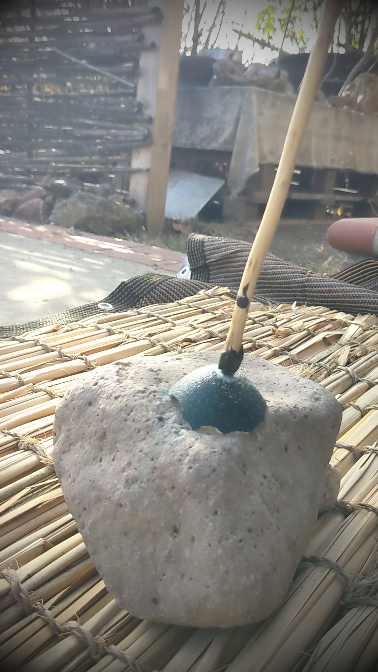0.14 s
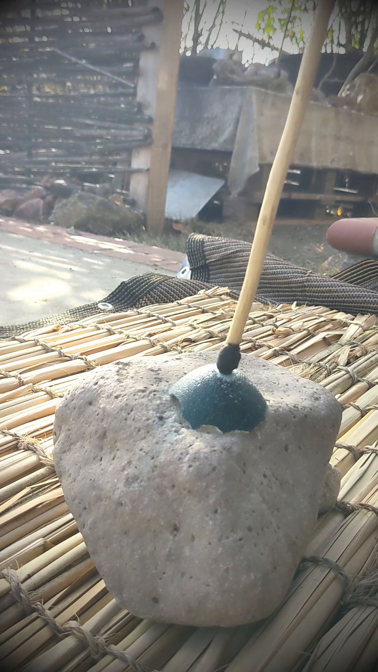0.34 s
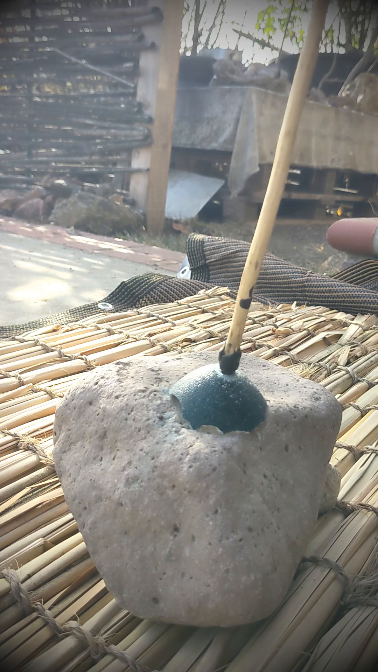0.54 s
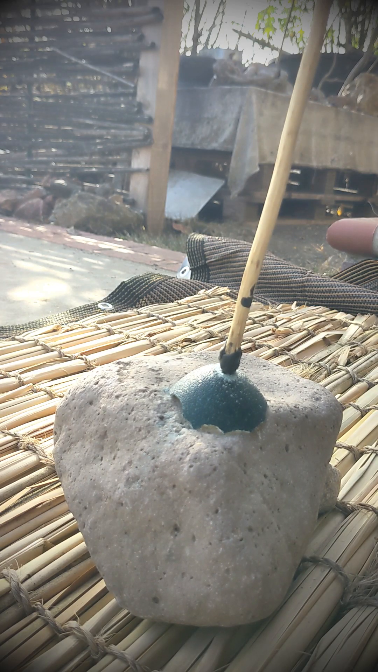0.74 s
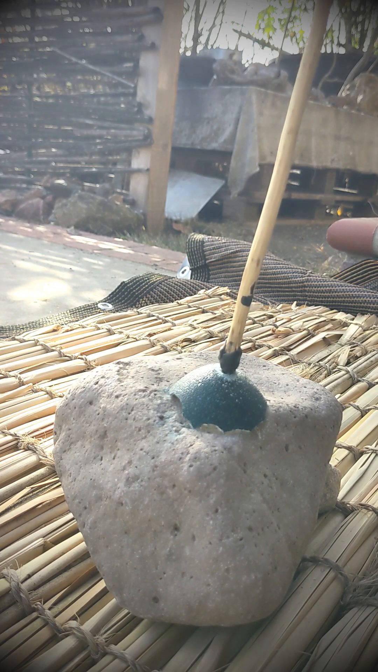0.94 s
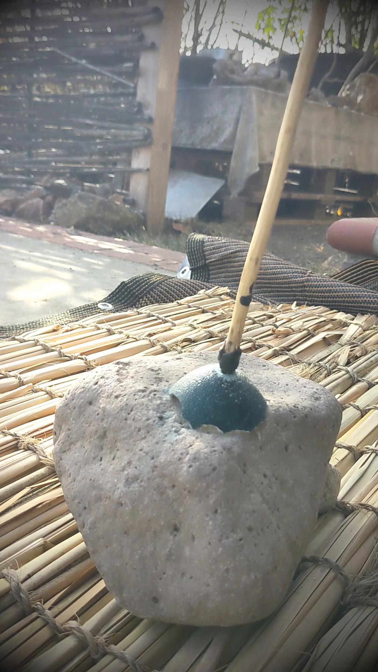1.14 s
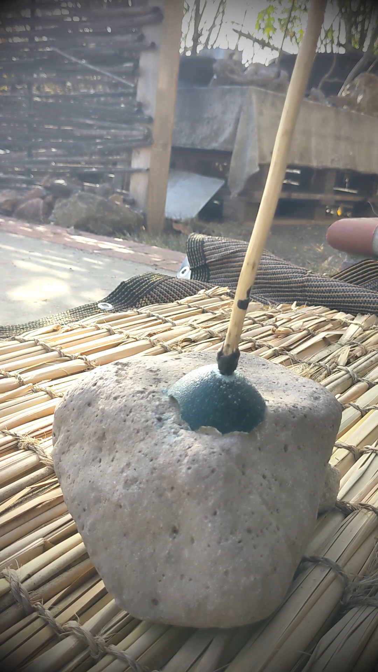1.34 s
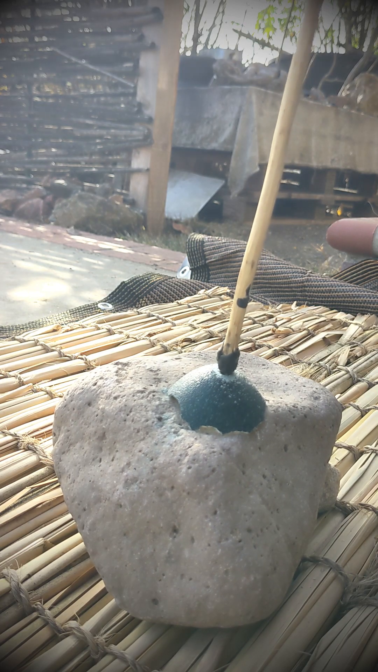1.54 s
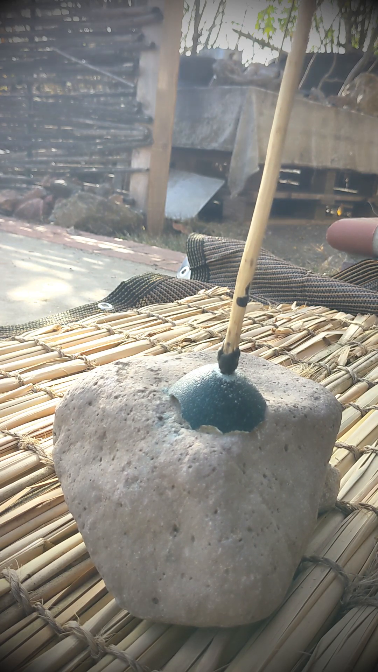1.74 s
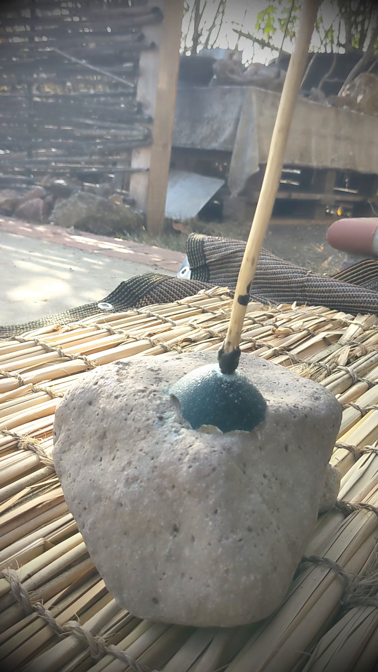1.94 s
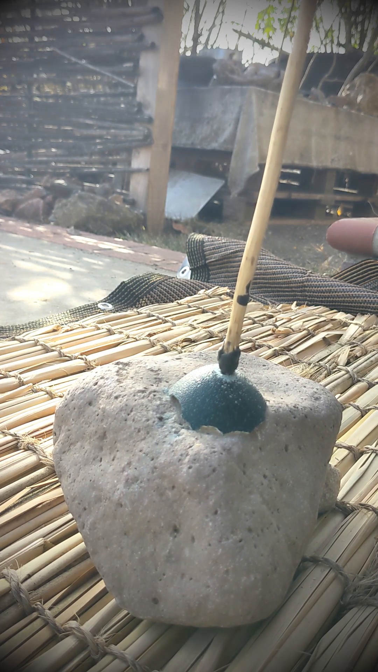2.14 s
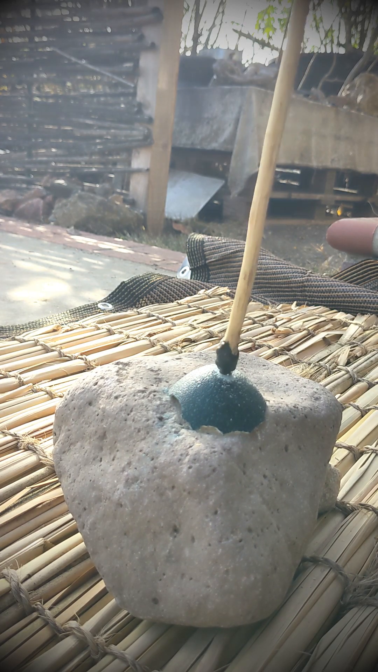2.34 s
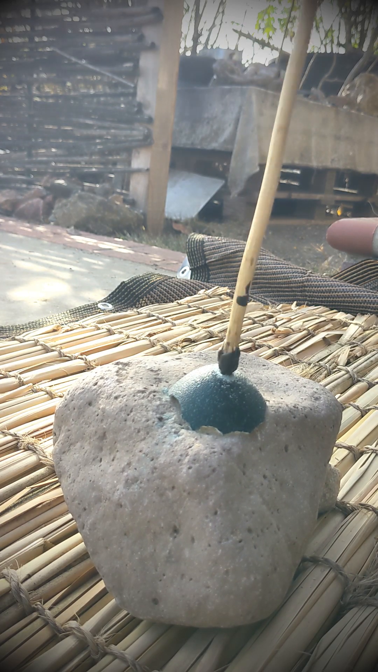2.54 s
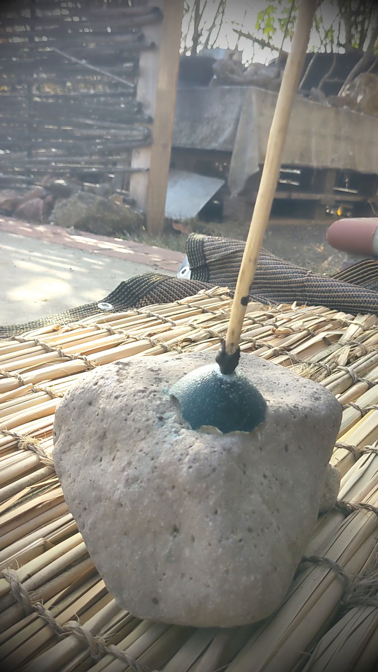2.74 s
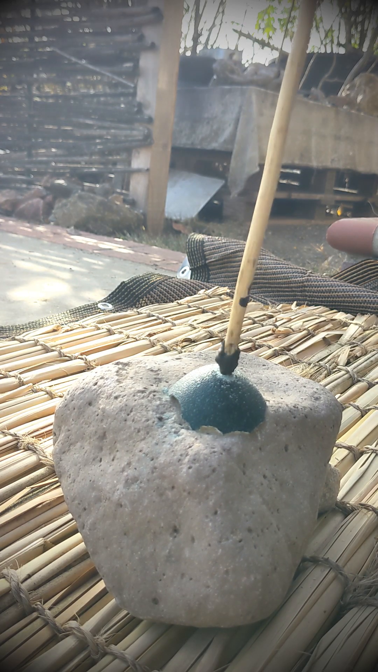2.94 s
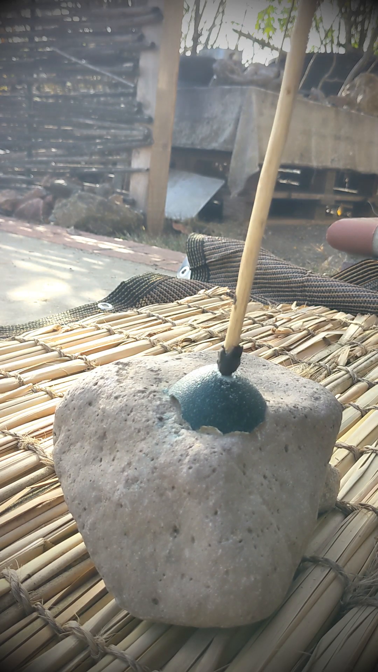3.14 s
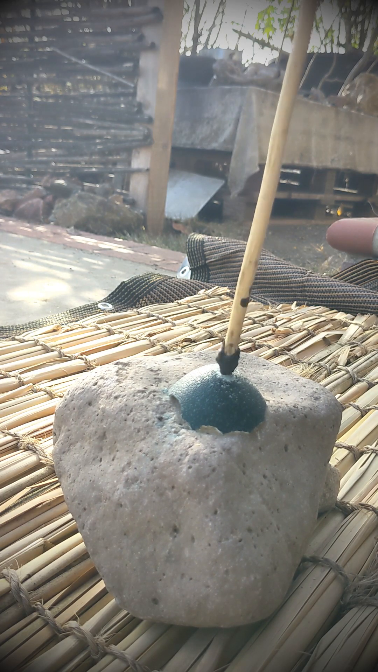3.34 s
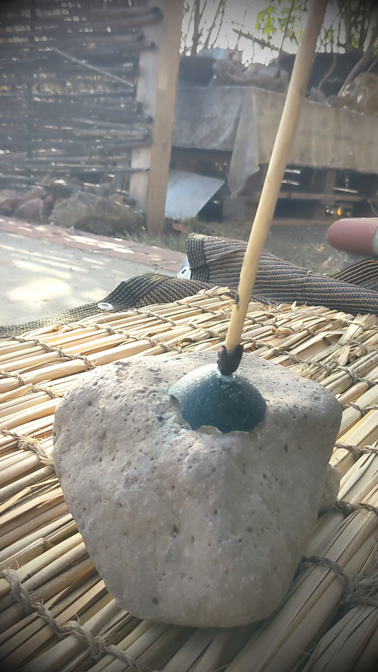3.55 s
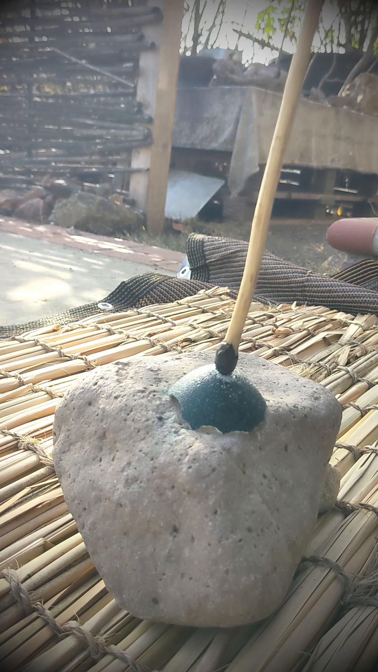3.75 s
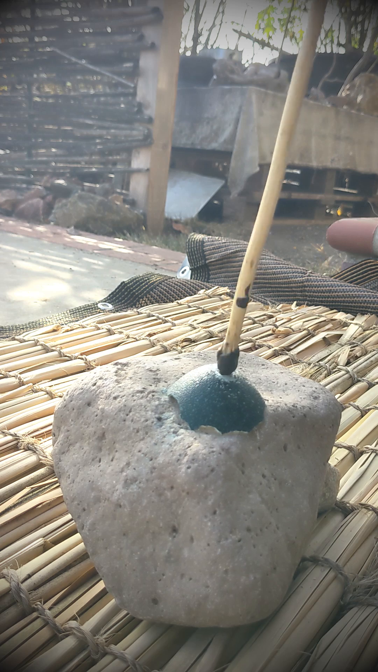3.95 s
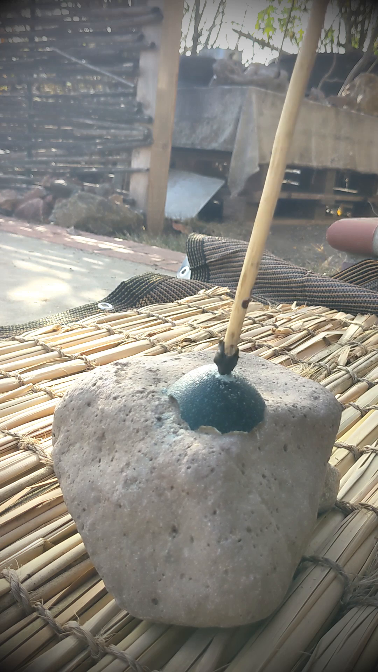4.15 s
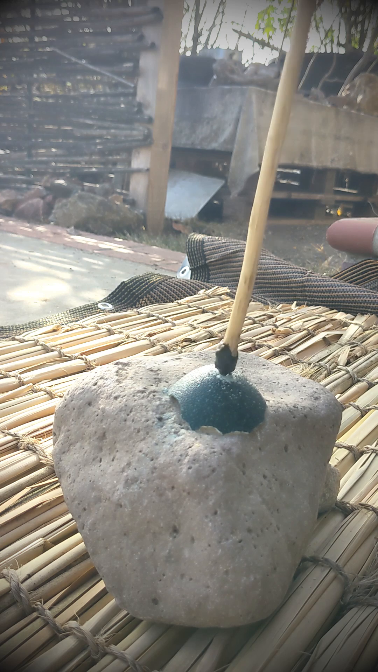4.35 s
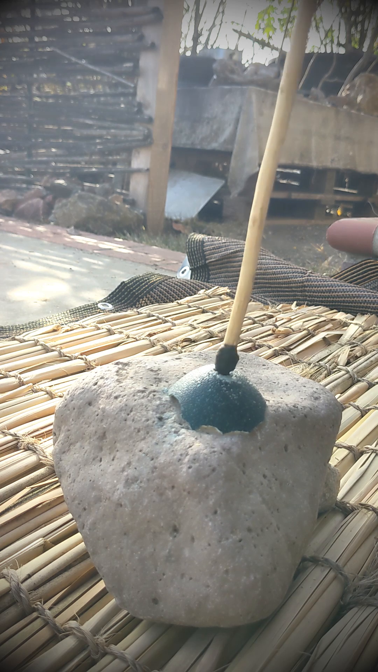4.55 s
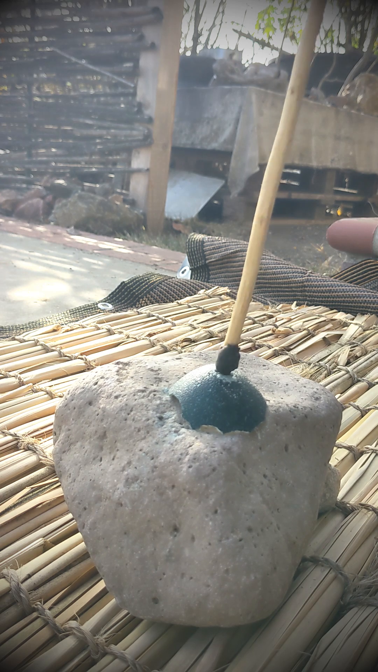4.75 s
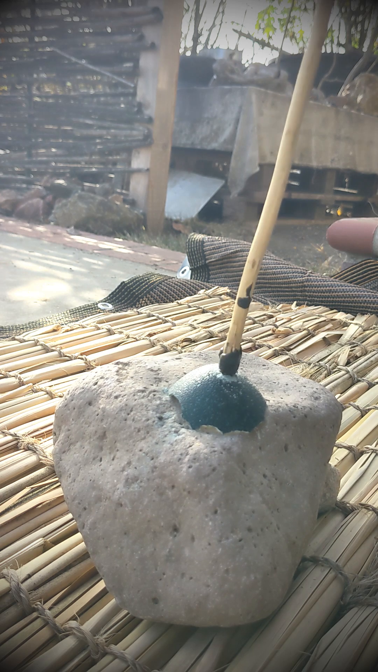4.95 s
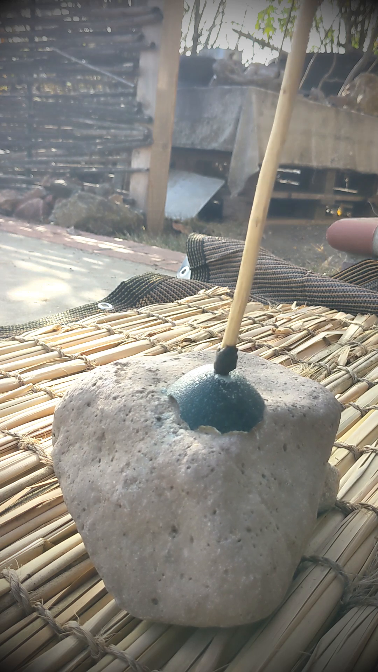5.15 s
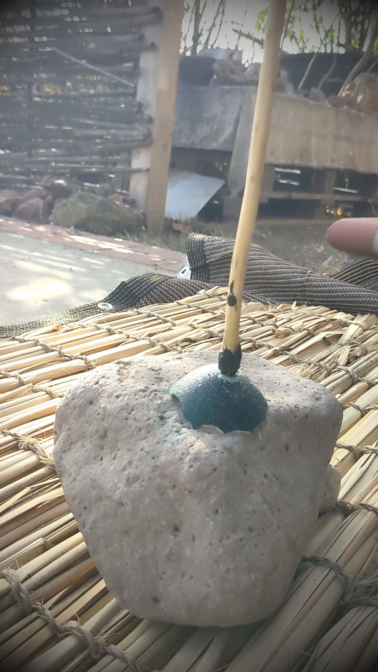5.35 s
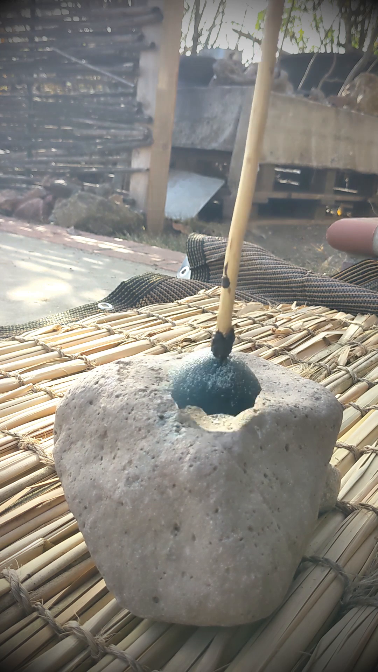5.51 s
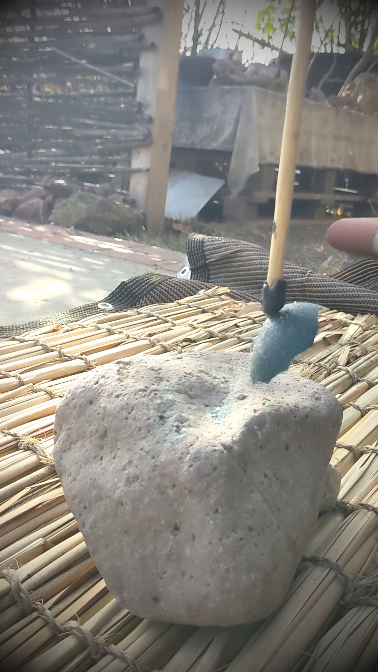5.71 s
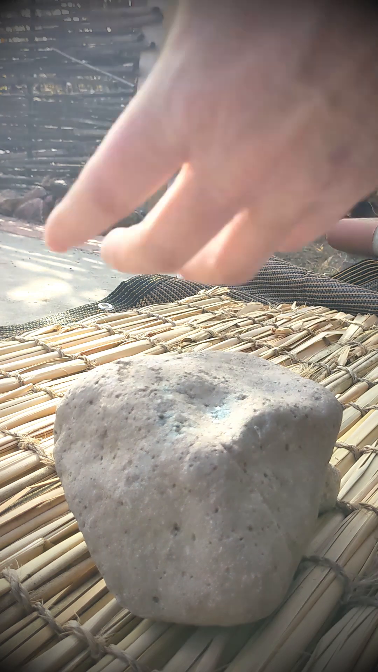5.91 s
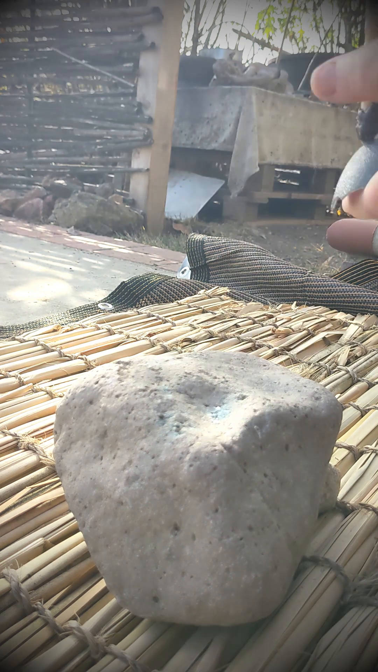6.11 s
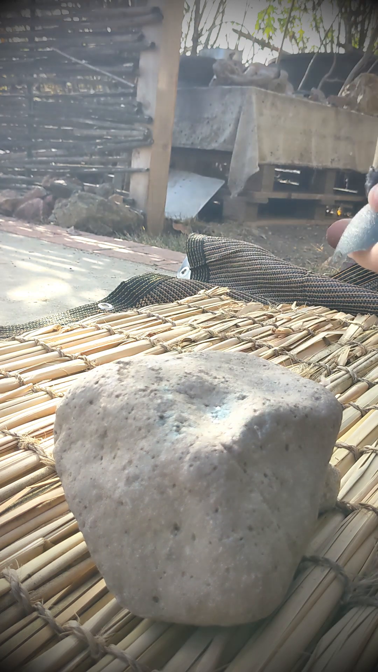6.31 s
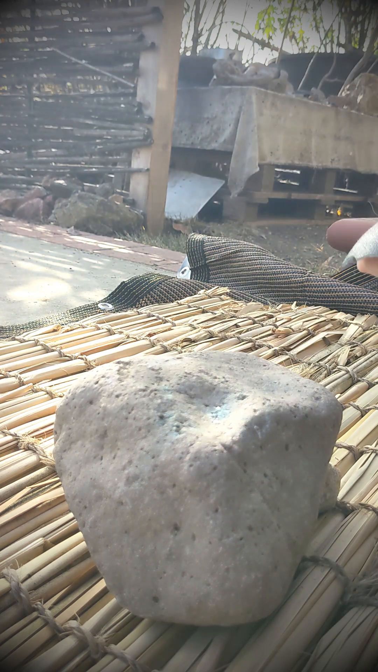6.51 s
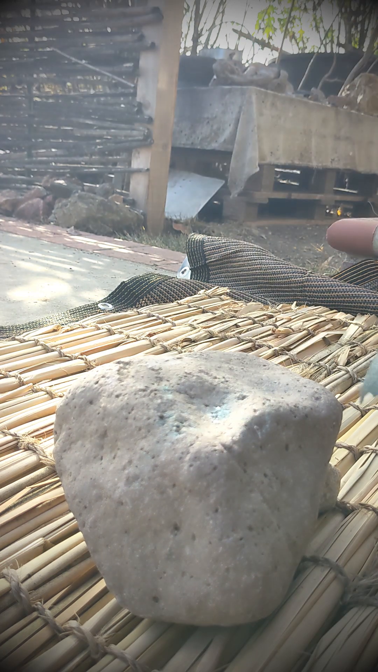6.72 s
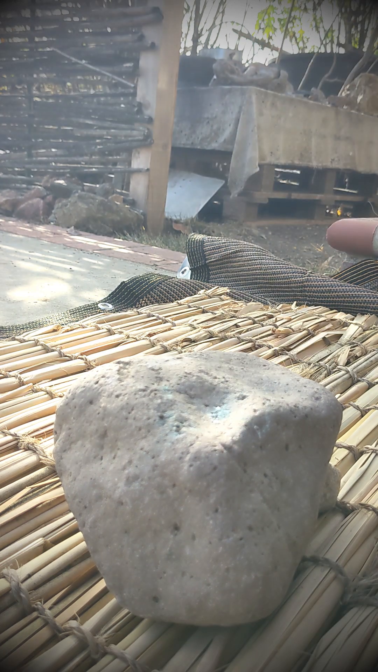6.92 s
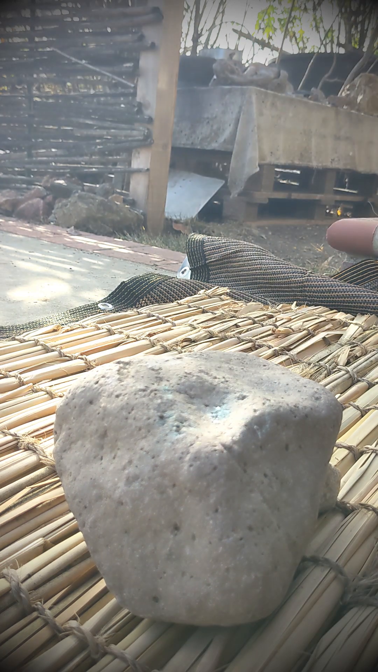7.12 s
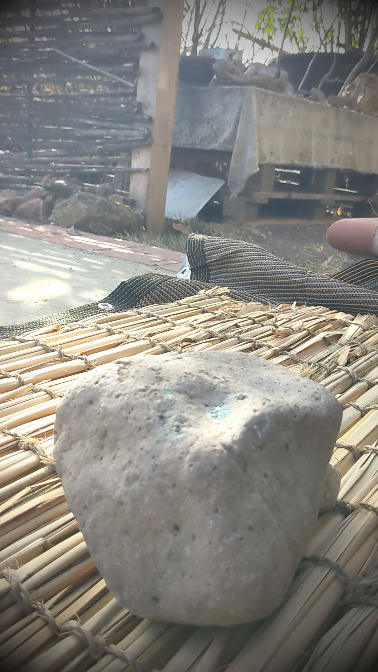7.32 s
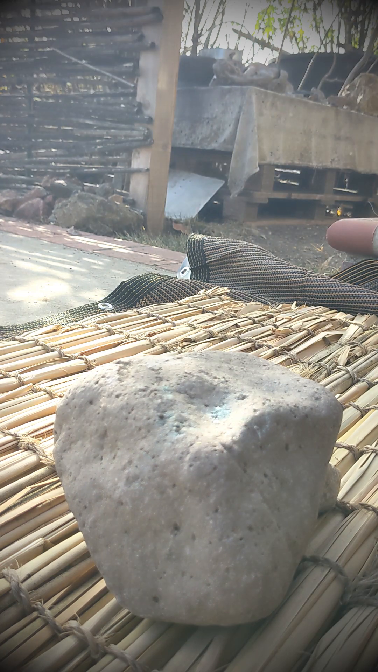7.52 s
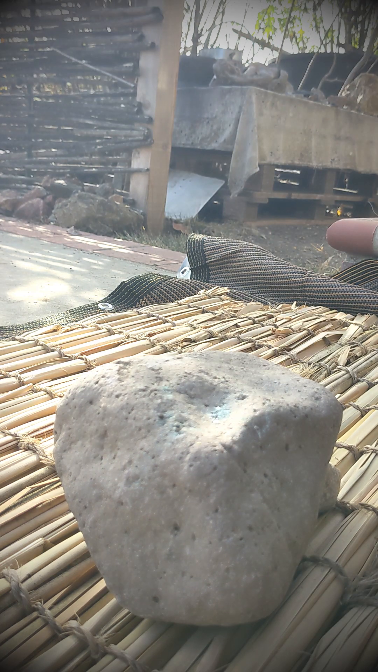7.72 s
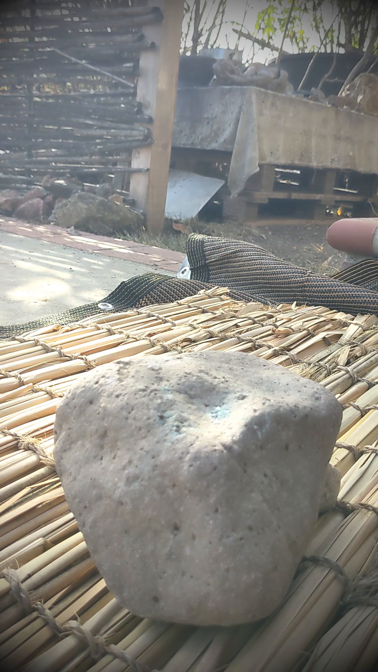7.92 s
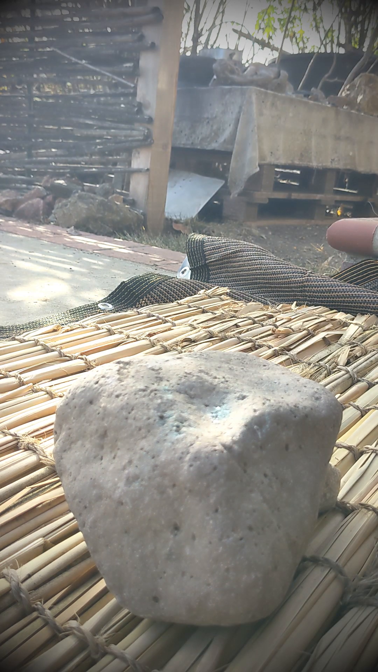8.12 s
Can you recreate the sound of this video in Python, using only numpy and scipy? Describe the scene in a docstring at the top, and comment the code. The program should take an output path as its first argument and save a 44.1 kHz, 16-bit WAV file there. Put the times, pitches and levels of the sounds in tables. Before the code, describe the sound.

Outdoor close stereo pickup, drill slightly right: five dry gritty strokes, then a quiet gap with small hoarse chirps and light ticks. After a crisp knock the twirling resumes softly, swelling into steady bright crunching scrapes with small surges. The tip drags free, leaving soft skin rustle, faint clicks, a cluster of chirps and a final hollow bump over faint air hiss and far rumble.

```python
"""A stone point grinds to and fro in the hollow of a rock, on a wooden drill twirled between the palms.
Each stroke crushes random grit that rings the shaft and the point; knocks, ticks and a soft bump mix in.
Small birds chirp as gliding, slightly hoarse tones with an echo from the yard.
Grit noise makes the hiss of hands on the shaft and of the point dragging out of the hollow;
shaped noise makes a distant low rumble and a thin hiss of air."""
import sys
import numpy as np
from scipy import signal
from scipy.fft import rfft, irfft, next_fast_len
from scipy.io import wavfile
from scipy.ndimage import uniform_filter1d, map_coordinates

SR = 44100
rng = np.random.default_rng(int(sys.argv[2]) if len(sys.argv) > 2 else 0)


def master_out(mix):
    """Clip the mix to full scale and print it as 16-bit PCM to the path in sys.argv[1]."""
    frames = np.transpose(np.atleast_2d(mix))
    ceiling = np.clip(frames, -1, 1)
    pcm = np.round(ceiling * 32767).astype(np.int16)
    wavfile.write(sys.argv[1], SR, pcm)


N = 360287
TIME = np.arange(N) / SR  # seconds

# Resonances of the shaft with its point, on the rock; levels are relative:
# pitch_hz, width_hz, left_level_db, right_level_db
SHAFT_MODES = [(276, 142, -14, -15), (692, 310, -17, -25.5), (1228, 410, -18, -14.5),
               (1950, 270, -18, -7.5), (2140, 290, -9.5, -4), (2356, 274, -3, 3), (2726, 390, -3, -6),
               (2886, 376, -5.5, -0.5), (3220, 480, -17.5, -8.5)]
# Resonances of the stone point; levels are relative: pitch_hz, width_hz, left_level_db, right_level_db
POINT_MODES = [(3830, 900, -10.5, -10.5), (4550, 610, -10.5, -9), (5280, 940, -12.5, -12),
               (6340, 680, -10, -3.5), (7000, 510, -8.5, 2.5), (8100, 1050, -16.5, -10),
               (9050, 710, -15, -9), (10080, 1360, -16.5, -10.5), (11860, 1170, -14.5, -8.5),
               (12900, 800, -32, -15), (13800, 940, -22, -5), (14800, 1700, -12.5, -20)]


def amp(db):
    """Turn decibels into a plain gain."""
    return 10 ** (np.asarray(db) / 20)


def unit(x):
    """Scale x to an average (rms) level of 1."""
    return x / np.sqrt(np.mean(x ** 2) + 1e-20)


def along(points, hz):
    """Read a curve of (Hz, value) points, joined by straight lines on a log pitch axis."""
    point_hz, values = np.transpose(points)
    return np.interp(np.log(hz + 1), np.log(point_hz + 1), values)


def wobble(rate):
    """Draw a smooth random curve through `rate` random points a second."""
    knots = rng.standard_normal(int(N * rate / SR) + 4)
    return map_coordinates(knots, [TIME * rate])


def filtered(x, response):
    """Multiply the spectrum of x by a response that depends on frequency."""
    size = next_fast_len(N + SR // 2)
    hz = np.fft.rfftfreq(size, 1 / SR)
    return irfft(rfft(x, size) * response(hz), size)[..., :N]


def resonate(x, modes):
    """Let x ring a solid body: each resonance is a steep peak, with its own level left and right."""
    size = 8192
    hz = np.fft.rfftfreq(size, 1 / SR)
    power = 0
    for centre, width, left, right in modes:
        damping = (hz * width) ** 2
        peak = (damping / ((centre ** 2 - hz ** 2) ** 2 + damping)) ** 1.61  # steep skirts
        power = power + amp([[left], [right]]) ** 2 * peak
    # folding the cepstrum forward gives a ring that starts at the strike, never before it
    cepstrum = irfft(np.log(power + 1e-6) / 2)
    cepstrum[:, 1:size // 2] *= 2
    cepstrum[:, size // 2 + 1:] = 0
    ring = irfft(np.exp(rfft(cepstrum)))
    ring /= np.linalg.norm(ring)
    return signal.fftconvolve(np.atleast_2d(x), ring, axes=1)[:, :N]


def echoes(x, t60, wet_db):
    """Add a fading noise tail (60 dB down in t60 seconds) that differs left and right and keeps changing."""
    t = TIME[:SR]
    tails = rng.standard_normal((3, 2, SR)) * amp(-60 * t / t60)
    tails /= np.linalg.norm(tails, axis=2, keepdims=True)
    blend = np.array([wobble(9) for tail in tails])
    blend /= np.linalg.norm(blend, axis=0)
    wet = 0
    for share, tail in zip(blend, tails):
        wet = wet + signal.fftconvolve(np.atleast_2d(x * share), tail, axes=1)[:, :N]
    return x + amp(wet_db) * wet


def grit(rate, spread_db):
    """Scatter tiny fractures as single clicks of uneven size, on average `rate` a second."""
    cracks = rng.random(N) < rate / SR
    size = amp(spread_db * np.minimum(rng.standard_normal(N), 2))
    return unit(cracks * size * rng.choice([-1, 1], N))


def lasting(start, length):
    """Find the samples that an event covers, and the share of it gone by at each."""
    on = slice(*np.searchsorted(TIME, [start, start + length]))
    return on, np.clip((TIME[on] - start) / length, 0, 1)


def swing(start, length, late=1):
    """Speed of one movement, from standstill to standstill; late above 1 delays its crest."""
    on, share = lasting(start, length)
    return on, np.abs(np.sin(np.pi * share ** late))


def grinding():
    """Each stroke speeds up and stops; coarse grains jolt the shaft, fine powder hisses at the point."""
    # Strokes of the palms: start_s, length_s, level_db (relative)
    strokes = [(-0.046, 0.11, -37), (0.06, 0.14, -39.5), (0.2, 0.13, -38), (0.305, 0.16, -45),
               (0.446, 0.13, -46.0), (2.375, 0.17, -48), (2.544, 0.17, -52), (2.69, 0.15, -50),
               (2.827, 0.13, -44), (2.953, 0.13, -43.5), (3.081, 0.12, -42), (3.202, 0.13, -41),
               (3.319, 0.12, -39), (3.433, 0.13, -40.5), (3.552, 0.12, -41.5), (3.669, 0.12, -41.5),
               (3.77, 0.149, -42.5), (3.909, 0.13, -38), (4.017, 0.13, -37), (4.135, 0.14, -41.5),
               (4.262, 0.13, -38.0), (4.386, 0.14, -38.5), (4.504, 0.13, -38.5), (4.63, 0.13, -34.5),
               (4.738, 0.14, -36.5), (4.867, 0.13, -36.5), (4.978, 0.12, -33.5), (5.098, 0.13, -32.5),
               (5.198, 0.14, -37), (5.315, 0.15, -37), (5.414, 0.17, -51.5)]
    # The point bites into fresh grit and the scrape surges: start_s, level_db (relative)
    bites = [(.123, -43), (0.143, -39), (.263, -33), (.394, -40), (.511, -35.5), (3.249, -49),
             (3.707, -40.5), (4.184, -44), (4.199, -38.5), (4.438, -36), (4.66, -49), (4.771, -43),
             (4.91, -33), (5.025, -43), (5.137, -35.5), (5.248, -42), (5.354, -36), (5.607, -45)]
    # How strongly the shaft rings over time: time_s, level_db (above the grit)
    shaft_ring = [(0, 1), (.55, 0), (2.45, 4), (3.1, 2.5), (3.8, 8), (4.1, 4), (4.5, 7), (4.95, 4),
                  (5.5, 1.5)]
    spin_late, scrape_power = 1.406, 2.03  # the spin crests late; scrape grows as a power of the spin
    turn_db = -28.5  # scrape left while the drill turns round, against the height of the stroke
    bite_t60_s = 0.042  # time for a bite to fade by 60 dB

    rub = np.zeros(N)
    for start, length, db in strokes:
        on, spin = swing(start, length, spin_late)
        rub[on] += amp(db) * (amp(turn_db) + spin ** scrape_power)
    t = TIME[:SR // 10]
    for start, db in bites:  # a bite starts at once and wears off as the grit is crushed
        rub[round(start * SR):][:len(t)] += amp(db - 60 * t / bite_t60_s)
    rub *= unit(amp(1.5 * wobble(150) + 1.7 * wobble(700)))  # the point rides over the uneven hollow

    coarse = grit(rate=1300, spread_db=3.5)
    powder = np.array([grit(rate=8200, spread_db=0), grit(rate=9000, spread_db=11.5)])  # left, right
    ring = amp(np.interp(TIME, *np.transpose(shaft_ring)))
    shaft = resonate(rub * ring * coarse, SHAFT_MODES)
    point = resonate(rub * (0.5 * coarse + 0.8 * powder), POINT_MODES)
    shaft = amp(0.5) * echoes(shaft, t60=0.078, wet_db=-3)
    point = amp(3) * echoes(point, t60=0.02, wet_db=-2)
    return shaft + point


def shifting(x, depth_db):
    """As the point turns, the contact favours now one resonance, now another: random gains per pitch."""
    spectrum = signal.stft(x, nperseg=256)[2]
    field = rng.standard_normal(spectrum.shape[1:])
    field = uniform_filter1d(field, size=4, axis=0)  # smooth over pitch
    field = uniform_filter1d(field, size=6, axis=1)  # smooth over time
    return signal.istft(spectrum * amp(depth_db * unit(field)), nperseg=256)[1][:, :N]


def from_right(pair, lag_ms):
    """The drill stands to the right, so its sound reaches the left side later."""
    lags_s = np.array([[lag_ms], [0]]) / 1000
    return filtered(pair, lambda hz: np.exp(-2j * np.pi * hz * lags_s))


def rush(spectrum):
    """Make stereo outdoor noise of rms 1, much alike left and right in the bass."""
    # Likeness of left and right: pitch_hz, likeness (1 = same, 0 = unrelated, below 0 = opposed)
    likeness = [(60, 0.98), (150, 1), (380, 0.87), (950, 0.12), (2380, 0.28), (5980, -0.2), (15000, -0.31)]

    def mid_and_side(hz):
        turn = np.arccos(np.clip(along(likeness, hz), -1, 1)) / 2
        return amp(along(spectrum, hz)) * np.array([np.cos(turn), np.sin(turn)])

    mid, side = filtered(rng.standard_normal((2, N)), mid_and_side)
    return unit(np.array([mid + side, mid - side]))


def yard():
    """A far, slowly heaving rumble under a thin hiss of air, both made of shaped noise."""
    # Spectrum of the distant rumble: pitch_hz, level_db (per Hz, relative)
    rumble = [(15, -74), (25, -25), (37, -34), (57, -5.5), (81, -3), (130, -1.5), (173, -9), (205, -9.5),
              (292, -22.5), (323, -20), (445, -23.5), (702, -21.5), (1400, -25.5), (1820, -63),
              (3080, -120)]
    # Spectrum of the thin hiss of air: pitch_hz, level_db (per Hz, relative)
    air = [(1000, -13), (1400, -3), (1650, -2), (2300, 0), (3500, -4), (5000, -4), (7000, -8.5),
           (10000, -13.5), (14000, -15.5), (16000, -9.5)]
    return amp(-51 + 1.32 * wobble(5.4)) * rush(rumble) + amp(-64.5) * rush(air)


def hands():
    """Dry skin, or once the point leaving the hollow, rubs with a fine, uneven hiss and specks of dust."""
    # Hands slide along the shaft; at 5.6 s the point drags out of the hollow and the drill rings free:
    # start_s, length_s, level_db (relative)
    slides = [(1.335, 0.1, -62), (1.687, 0.19, -62), (5.603, 0.033, -40.5), (6.225, 0.27, -64.5),
              (6.352, 0.3, -56), (6.825, .5, -71), (7.252, 0.049, -62), (7.689, 0.057, -58),
              (7.73, 0.16, -67), (8.1, .07, -50)]
    # Resonances of the drill hanging free in the hand; levels are relative:
    # pitch_hz, width_hz, left_level_db, right_level_db
    loose_modes = [(2910, 230, -9, 1), (4800, 1400, -8.5, -4), (7100, 400, -5, 5), (8150, 260, 0.5, -5),
                   (9220, 1900, -7, -2), (11940, 1200, -3, -1), (13600, 1700, -1.5, 3.5),
                   (15100, 1300, 0, -4)]
    grip_db = -72.5  # the fingers never lie quite still
    slide_power = 1.5  # the hiss grows as this power of the sliding speed

    rub = np.full(N, amp(grip_db))
    for start, length, db in slides:
        on, speed = swing(start, length)
        rub[on] += amp(db) * speed ** slide_power
    grains = np.array([grit(rate=4400, spread_db=0) + 0.52 * grit(rate=87, spread_db=1.5)
                       for side in range(2)])
    return rub * amp(3.26 * wobble(50)) * unit(resonate(grains, loose_modes))


def knocks():
    """A knock or tick is a sharp push and its quick rebound, amid a few milliseconds of crunch."""
    # Knocks and ticks: the point knocks, catches or chips; late faint ticks as the loose drill is handled:
    # start_s, crunch_level_db, push_level_db (both relative)
    hits = [(.2555, -7, -7.5), (0.4139, -4, -15), (.7721, -33, -49), (.8042, -38, -33), (.845, -29, -31),
            (1.351, -26, -36), (1.387, -26, -36), (1.7911, -12.5, -28), (2.291, -18.5, -37.5),
            (2.443, 6, 3), (2.603, -25, -40), (3.362, -7, -18), (3.398, -13, -11.5), (3.601, -9, -12),
            (3.7061, -29, -13), (4.0553, -7.5, -21), (4.226, -16, -11), (4.9444, -5, -8.5),
            (5.347, -14, -14), (5.613, -15, -12.5), (6.6112, -23, -35), (6.6723, -27, -37),
            (6.766, -27.5, -40)]
    contact, rebound = SR // 2000, SR // 5000  # samples: wait before the push, then before the rebound

    push, crunch = np.zeros(N + SR), np.zeros((2, N + SR))
    t = np.arange(SR // 50) / SR
    envelope = amp(-60 * t / 0.0081) * (1 - np.exp(-t / 0.0016))  # quick rise, quick fade
    for start, crunch_db, push_db in hits:
        at = round(start * SR)
        chips = rng.standard_normal((2, len(t))) * envelope
        crunch[:, at:at + len(t)] += amp(crunch_db) * chips / np.linalg.norm(chips[0])
        # push and rebound are opposite, so little bass is left
        push[[at + contact, at + contact + rebound]] += amp(push_db) * np.array([1, -1])
    body = resonate(push[:N], SHAFT_MODES) + resonate(crunch[:, :N], POINT_MODES)
    return echoes(body, t60=0.095, wet_db=-10.5)


def far_calls():
    """Faint far birds at random moments and pitches: (start_s, length_s, pitch_hz, level_db)."""
    calls_per_s, length_s, level_db = 3.8, 0.119, -72.5
    middle_hz, spread_octaves = 3290, 0.5  # pitches lie up to this far above or below the middle
    calls = []
    for when, high in rng.random((round(calls_per_s * N / SR), 2)):
        pitch_hz = middle_hz * 2 ** (spread_octaves * (2 * high - 1))
        calls.append((when * N / SR, length_s, pitch_hz, level_db))
    return calls


def bird_calls():
    """List every tone with its course of pitch: (start_s, length_s, pitches_hz, level_db, hoarseness)."""
    # Chirp tones that sweep fast at first and level off on their last pitch;
    # some chirps have a second voice or overtone in a row of its own:
    # start_s, length_s, last_pitch_hz, sweep_octaves (+ = upward), level_db
    chirps = [(.631, 0.09, 7470, 0.33, -57), (1.795, 0.054, 3730, -0.26, -55),
              (1.982, .11, 2300, -0.16, -59), (2.544, .05, 2674, .3, -50),
              (2.694, 0.051, 2400, -0.27, -46.5), (2.828, .072, 3750, 0.13, -60),
              (5.665, .045, 6600, 0.19, -59), (5.718, 0.021, 6520, 0.39, -56),
              (5.775, .016, 6450, .45, -56.5), (7.15, 0.04, 3460, -0.39, -62),
              (7.401, .03, 3500, -0.41, -65), (7.544, .034, 4420, 0.75, -51.5),
              (7.71, 0.023, 3900, 0.87, -57), (7.712, 0.034, 7600, 0.73, -54.5),
              (7.731, .034, 4610, 0.056, -51), (7.82, 0.046, 3465, .6, -49), (7.853, .038, 3130, .45, -50),
              (7.947, .042, 6020, -.26, -47), (7.945, 0.045, 7200, -0.41, -53),
              (7.989, .032, 4520, .55, -43.5)]
    # Peeps, sung in two voices at once: start_s, length_s, pitch_hz, level_db
    peeps = [(0.844, .046, 6380, -54.5), (.952, .051, 6450, -54)]
    # Level whistles: start_s, length_s, pitch_hz, level_db
    whistles = [(.44, .14, 7470, -54), (.71, 0.11, 7600, -55.5), (1.06, .08, 2370, -61),
                (1.17, 0.076, 2310, -57.5), (1.357, 0.44, 1970, -67), (1.88, 0.12, 1780, -62),
                (1.923, 0.29, 3166, -60), (2.18, .11, 3913, -52.5), (2.204, 0.044, 6870, -57.5),
                (2.62, 0.082, 2504, -48), (2.828, 0.074, 3720, -57), (3.774, 0.044, 2396, -45),
                (5.86, 0.13, 2290, -68.5), (6.15, 0.67, 2955, -70.5)]
    # Hoarse calls: start_s, length_s, pitch_hz, level_db
    rasps = [(1.046, 0.078, 3420, -54.5), (1.17, .07, 3345, -54), (1.289, .12, 3150, -61.5),
             (1.45, 0.29, 3550, -60.5), (5.838, .015, 6000, -53.5), (6.013, .03, 6000, -57),
             (6.901, 0.24, 3900, -67.5)]
    chirp_bend = 1.5  # 1 is an even sweep; higher levels off sooner
    chirp_hoarse = 0.021  # unsteadiness, as a share of the pitch
    low_voice, low_voice_db = 0.76, -2  # second voice of a peep: share of the first's pitch, level against it
    # pitch at start, middle and end as shares of the call's pitch, then hoarseness as a share of the pitch
    peep_shape = (0.42, 1, 0.82, 0.019)
    whistle_shape = (0.94, 0.99, 0.95, 0.0284)
    rasp_shape = (0.9, 0.98, 0.91, 0.135)

    share = np.linspace(0, 1, 33)
    calls = []
    for start, length, last_hz, sweep, db in chirps:
        pitches = last_hz / 2 ** (sweep * (1 - share) ** chirp_bend)
        calls.append((start, length, pitches, db, chirp_hoarse))
    low_voices = [(start, length, hz * low_voice, db + low_voice_db) for start, length, hz, db in peeps]
    families = [(peep_shape, peeps + low_voices), (whistle_shape, whistles + far_calls()), (rasp_shape, rasps)]
    for (*glide, hoarse), rows in families:
        arch = np.polyval(np.polyfit([0, 0.5, 1], glide, 2), share)  # a smooth arch through three pitches
        calls += [(start, length, hz * arch, db, hoarse) for start, length, hz, db in rows]
    return calls


def birds():
    """Each row is one gliding tone; the fainter, the more of it is echo from the yard."""
    call_late = 1.24  # above 1 a tone is loudest after its middle
    direct, sung = np.zeros((2, N))
    rasp = wobble(900)  # fast unsteadiness of pitch
    flutter = amp(2.95 * wobble(70))  # slower unsteadiness of level
    for start, length, pitches, db, hoarse in bird_calls():
        on, share = lasting(start, length)
        pitch = np.interp(share, np.linspace(0, 1, len(pitches)), pitches)
        pitch = pitch * (1 + hoarse * rasp[on])
        swell = np.sqrt(np.abs(np.sin(np.pi * share ** call_late)))
        tone = np.sin(2 * np.pi * np.cumsum(pitch) / SR)
        note = amp(db) * flutter[on] * swell * tone
        direct[on] += np.interp(db, [-62, -48], [0.6, 0.95]) * note
        sung[on] += note
    echo = echoes(sung, t60=0.91, wet_db=1.0) - sung
    return direct + echo


def bump():
    """A soft, hollow bump: one low resonance, softly struck, that dies away fast."""
    start_s, pitch_hz, level_db = 8.112, 344, -36.5  # level before the soft onset
    t = np.maximum(TIME - start_s, 0)
    envelope = amp(level_db - 60 * t / 0.068) * (1 - np.exp(-t / 0.0057))
    return envelope * np.sin(2 * np.pi * pitch_hz * t)


def scene():
    """The drill close by, the yard around it."""
    drill = shifting(grinding(), depth_db=2.5) + knocks()
    drill = from_right(drill, lag_ms=0.068)
    return drill + yard() + hands() + birds() + bump()


def record(dry):
    """Keep nothing above the band limit."""
    top_hz = 15850
    return filtered(dry, lambda hz: hz < top_hz)


dry = scene()
out = record(dry)
master_out(out)
```